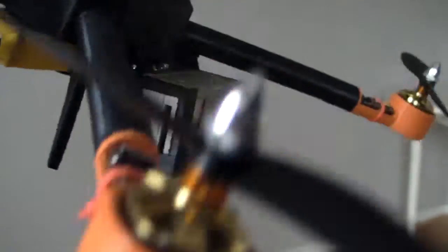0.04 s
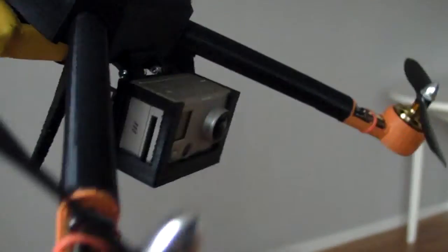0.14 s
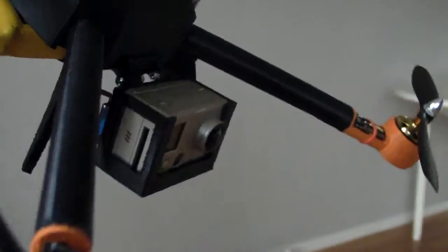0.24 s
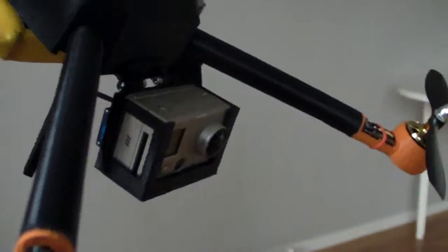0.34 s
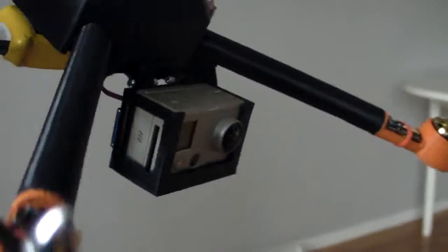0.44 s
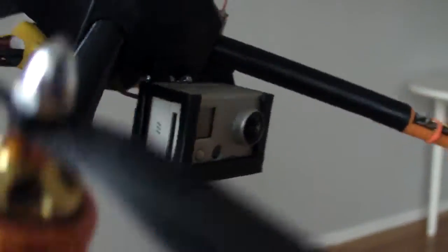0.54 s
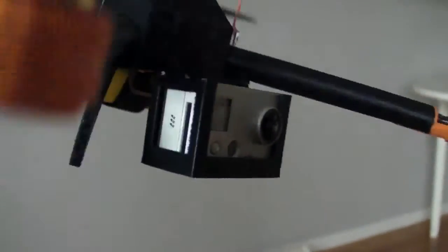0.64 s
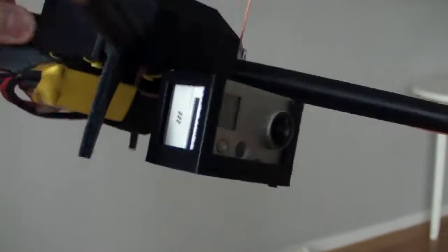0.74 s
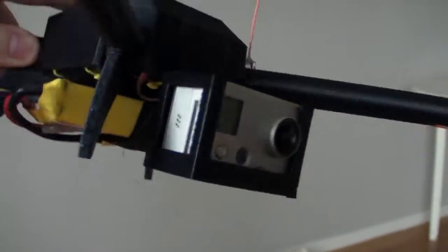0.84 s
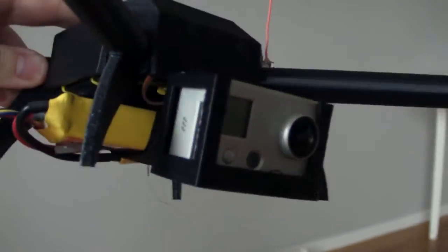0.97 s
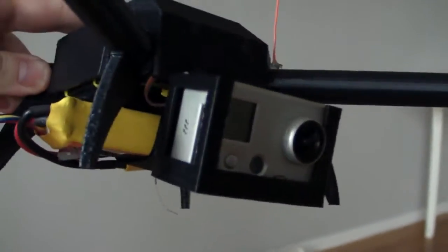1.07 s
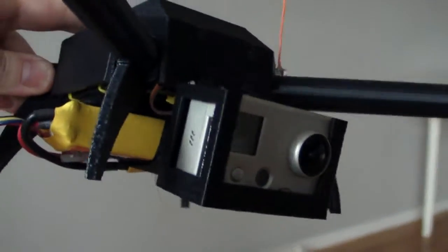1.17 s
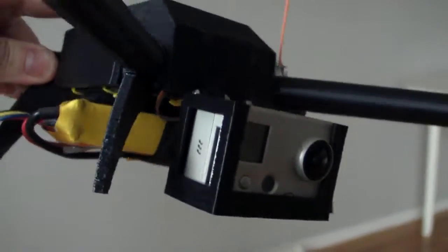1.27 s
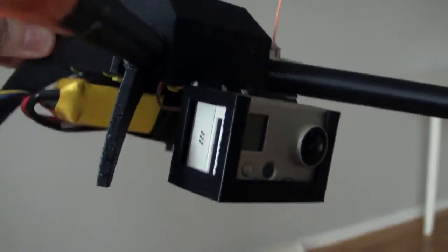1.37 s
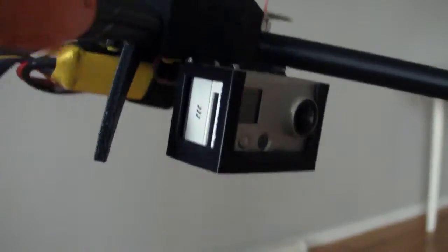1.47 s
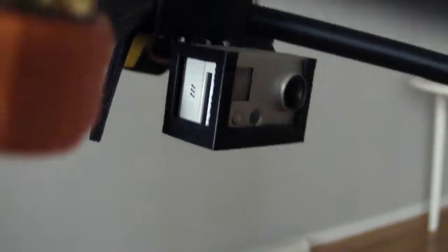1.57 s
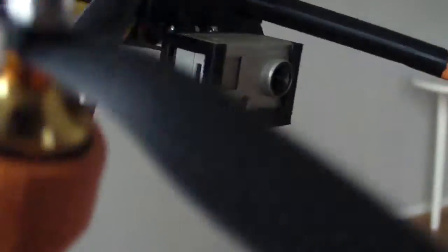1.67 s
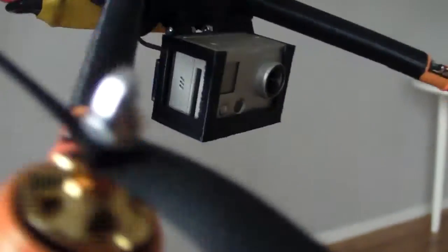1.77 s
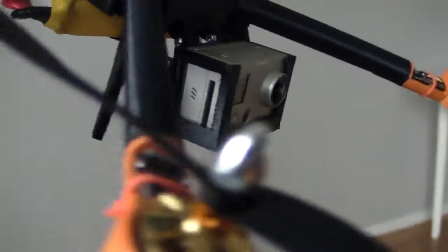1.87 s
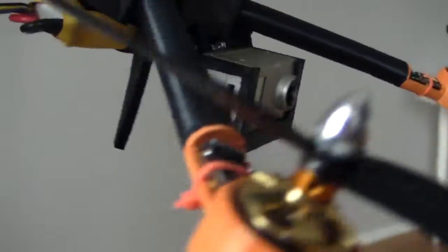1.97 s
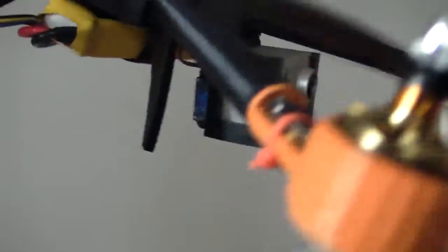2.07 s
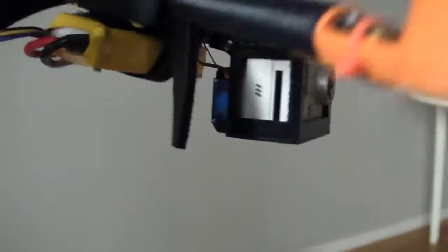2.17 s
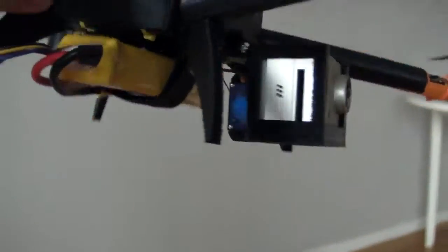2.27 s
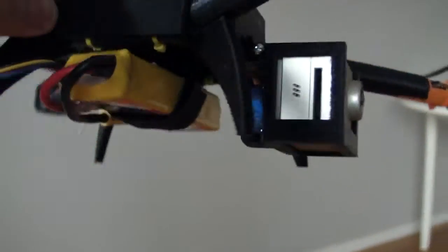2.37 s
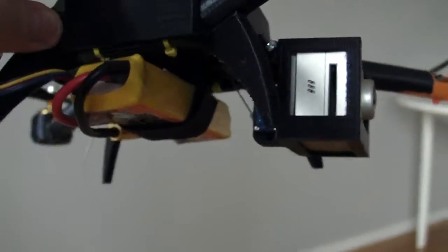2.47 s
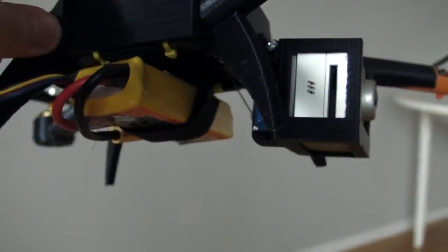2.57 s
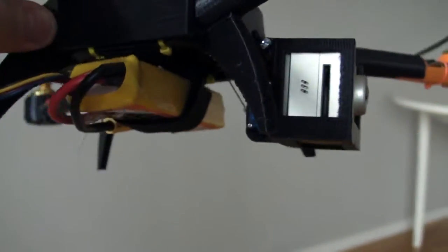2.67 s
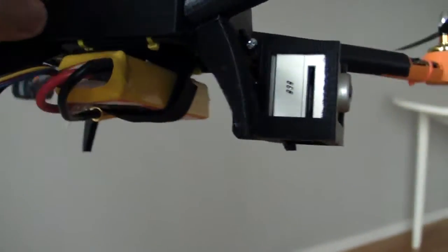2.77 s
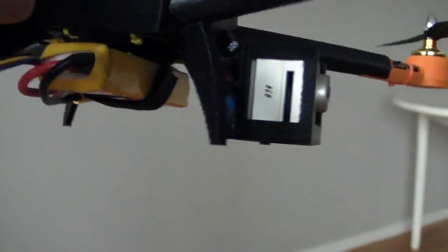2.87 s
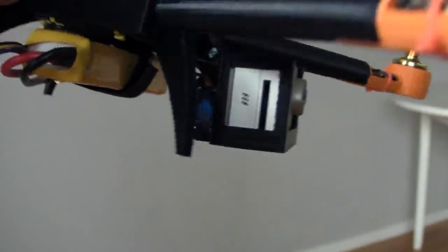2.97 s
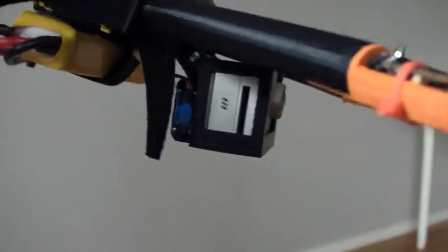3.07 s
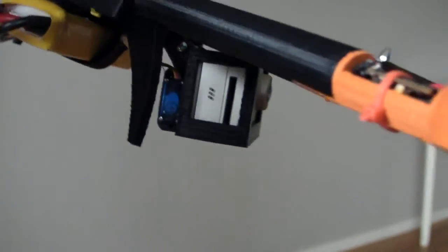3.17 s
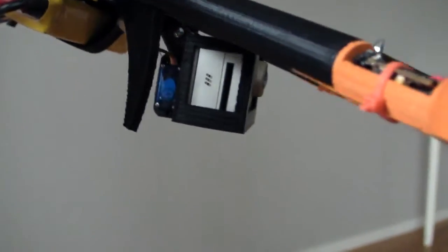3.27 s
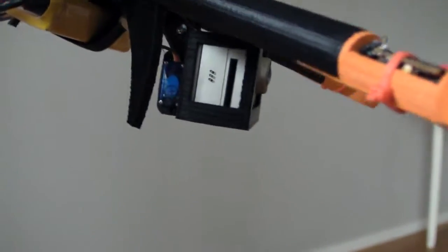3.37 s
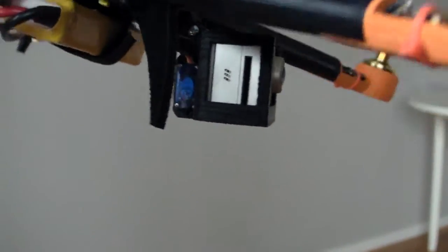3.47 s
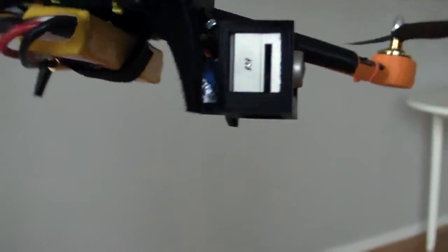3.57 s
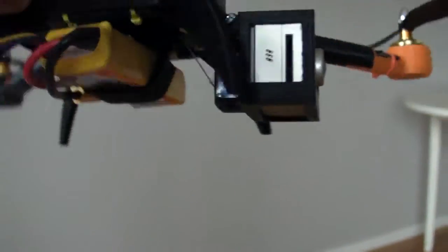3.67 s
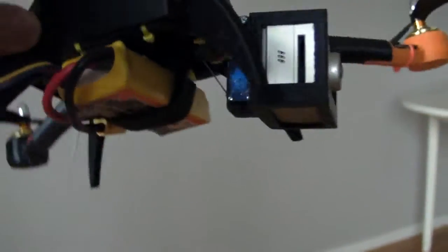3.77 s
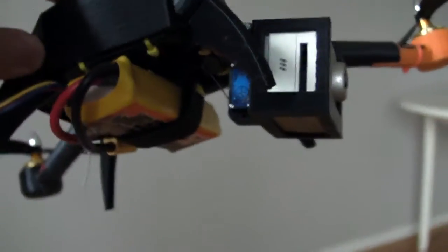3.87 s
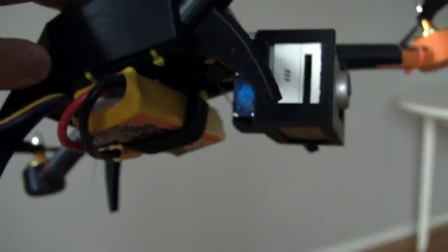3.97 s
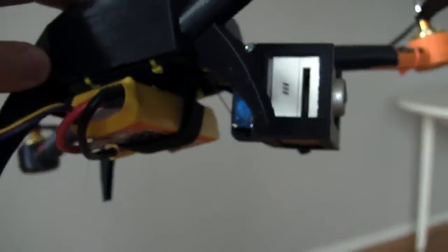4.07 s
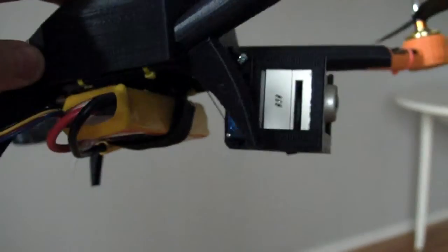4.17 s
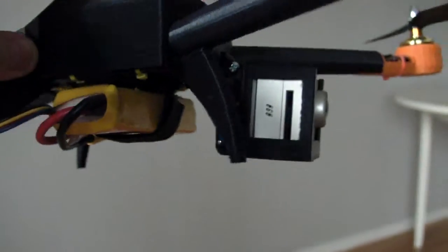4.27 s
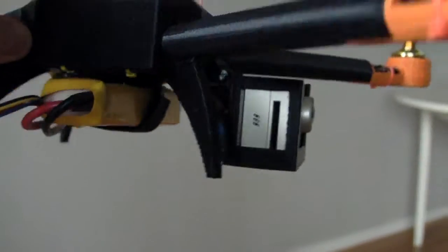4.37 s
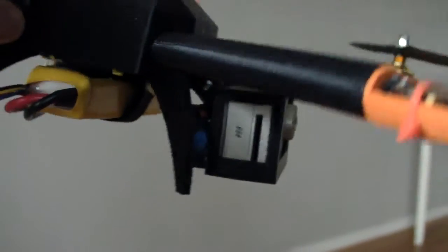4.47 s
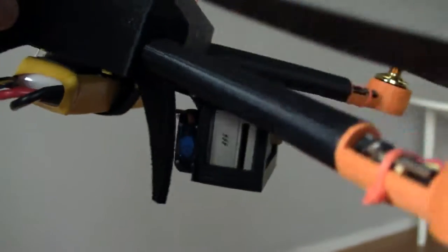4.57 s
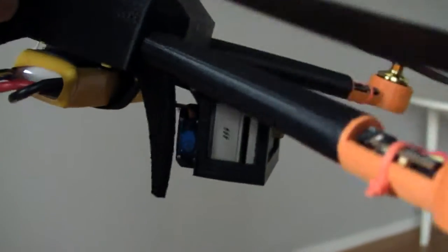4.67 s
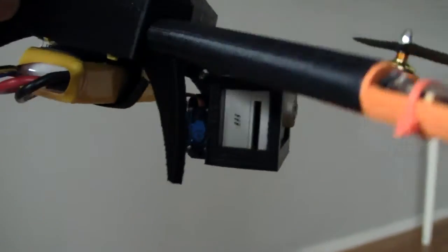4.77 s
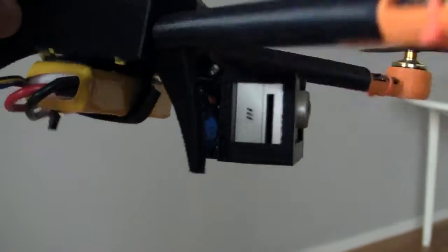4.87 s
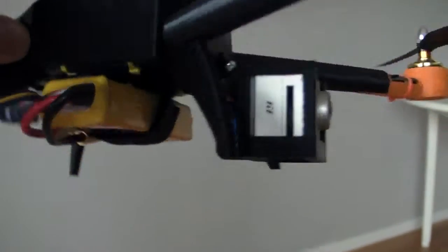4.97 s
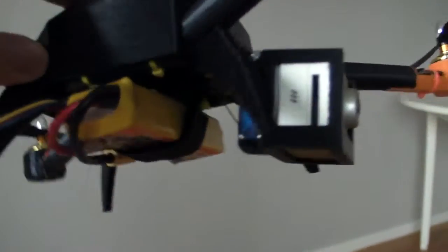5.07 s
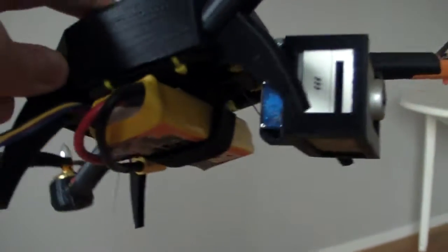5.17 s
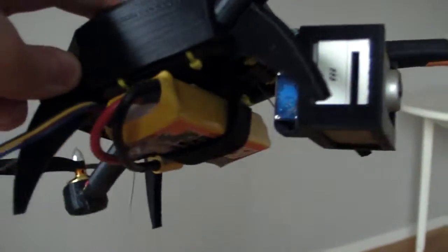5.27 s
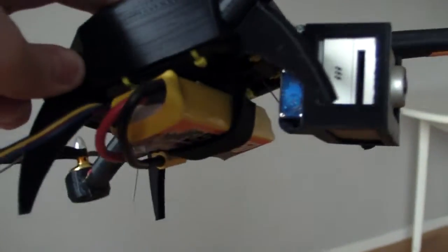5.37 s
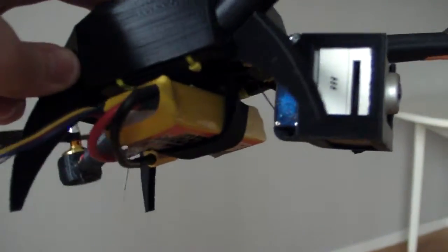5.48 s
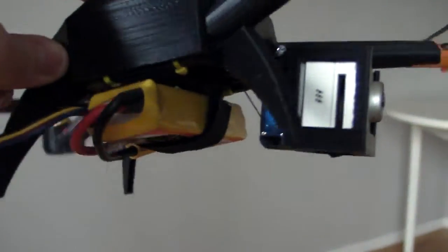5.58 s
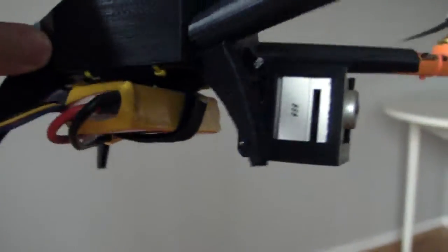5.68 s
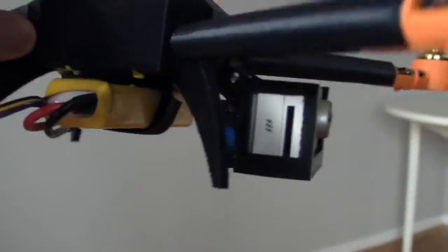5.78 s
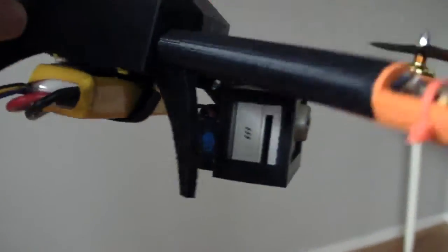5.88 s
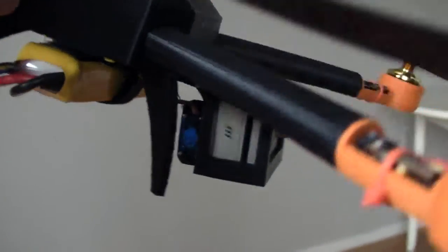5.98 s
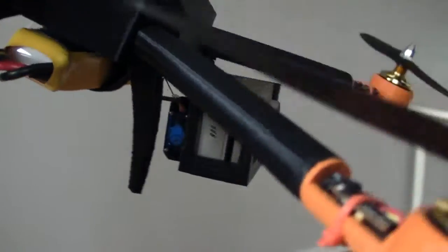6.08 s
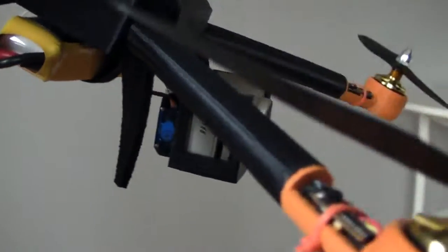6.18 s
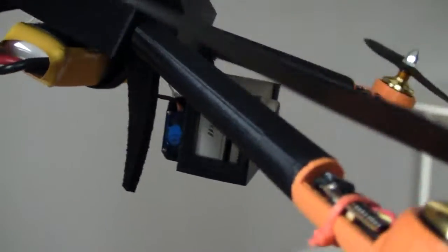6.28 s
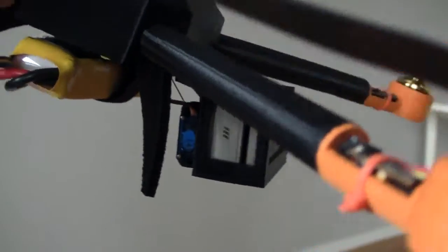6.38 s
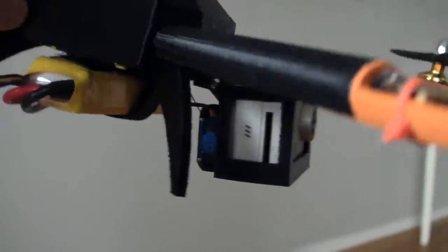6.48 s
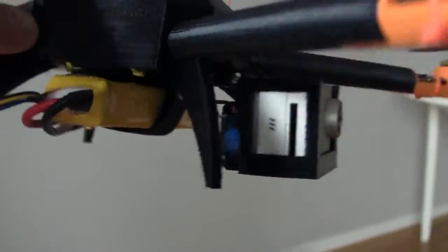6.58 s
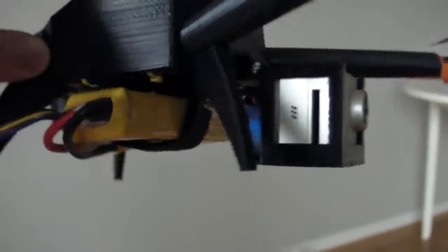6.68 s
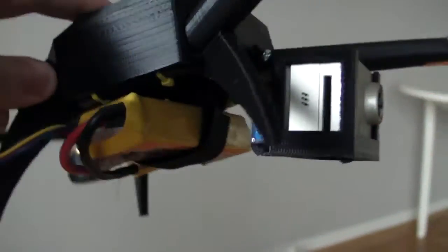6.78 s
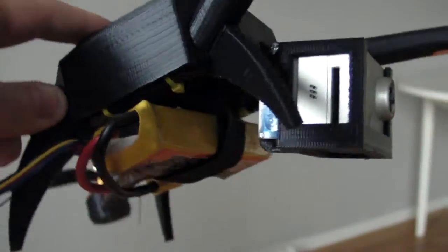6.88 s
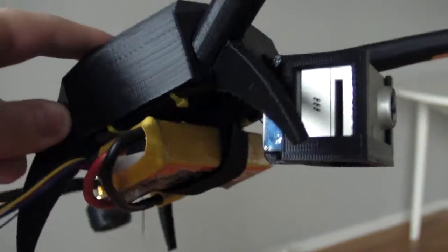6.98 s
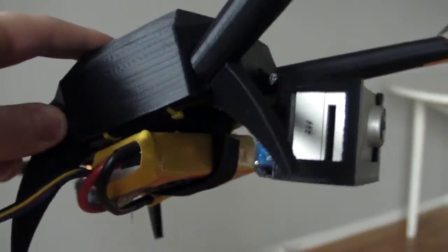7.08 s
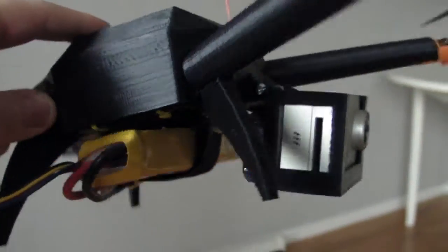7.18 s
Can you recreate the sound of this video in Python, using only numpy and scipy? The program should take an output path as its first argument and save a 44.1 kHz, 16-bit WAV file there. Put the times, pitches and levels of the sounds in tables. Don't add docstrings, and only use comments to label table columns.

```python
import sys
import numpy as np
from scipy import signal
from scipy.io import wavfile
from scipy.ndimage import uniform_filter1d

SR = 44100
rng = np.random.default_rng(int(sys.argv[2]) if len(sys.argv) > 2 else 0)


def output_pcm(signal):
    pcm = np.clip(np.atleast_2d(signal).T, -1, 1) * 32767
    wavfile.write(sys.argv[1], SR, np.round(pcm).astype(np.int16))


def field_ratio(decibels):
    return 10 ** (np.asarray(decibels, dtype=float) / 20)


N = 318843


def evened(x):
    return x / np.sqrt(np.mean(x ** 2) + 1e-20)


def read(points, hz):
    f, value = np.transpose(points)
    return np.interp(np.log(hz + 1), np.log(f + 1), value)


def slow(rate_hz):
    size = int(SR / 16 / rate_hz)
    coarse = rng.standard_normal(N // 16 + 2)
    coarse = evened(uniform_filter1d(uniform_filter1d(coarse, size), size))
    return np.interp(np.arange(N) / 16, np.arange(len(coarse)), coarse)


def add(mix, start_s, sound):
    part = mix[:, max(round(start_s * SR), 0):][:, :sound.shape[1]]
    part += sound[:, :part.shape[1]]


# pitch_hz, density_db (dB per Hz)
AIR_SPECTRUM = [(12, -50), (20, -20.5), (115, -3), (143, -5), (178, 0.5), (270, -9.5), (357, 1.5),
                (387, -4.5), (470, -10), (774, -11), (966, -14), (7510, -32.5), (15000, -62)]
# pitch_hz, left_right_likeness (-1 to 1)
COHERENCE = [(60, 0.67), (180, 0.71), (550, 0.32), (1650, 0.63), (4970, 0.35), (15000, -0.077)]


def air():
    frames, hz = N // 256 + 5, np.fft.rfftfreq(1024, 1 / SR)
    a, b, c, d, patches = rng.standard_normal((frames, 513, 5)).T
    patches = evened(uniform_filter1d(uniform_filter1d(patches, 6, 0), 20, 1))
    same = np.clip(read(COHERENCE, hz), -1, 1)[:, None]
    left = a + 1j * b
    right = same * left + np.sqrt(1 - same ** 2) * (c + 1j * d)
    z = np.array([left, right]) * field_ratio(read(AIR_SPECTRUM, hz)[:, None] + 2.42 * patches)
    return field_ratio(-45) * evened(signal.istft(z, nperseg=1024, noverlap=768)[1][:, :N])


# multiple_of_mains, level_db (rms)
MAINS_HARMONICS = [(2, -58.5), (3, -60), (4, -61), (5, -57.5), (6, -55), (7, -59.5), (8, -62.5)]
MAINS_HZ = 59.94


def buzz():
    turn = 2 * np.pi * MAINS_HZ * np.arange(N) / SR
    out = np.zeros(N)
    for k, db in MAINS_HARMONICS:
        out += np.sqrt(2) * field_ratio(db + 2.0 * slow(9.3)) * np.cos(k * turn + 0.39 * slow(14.0))
    return out


# start_s, level_db, pitch_hz, ring_s
FRAME_KNOCKS = [
    (2.771, -35, 295, 0.011),
    (2.802, -30.5, 144, 0.012),
    (3.377, -29.5, 377, 0.0098),
]


def knocks():
    out, t = np.zeros((1, N)), np.arange(3000) / SR
    for at, db, hz, ring in FRAME_KNOCKS:
        add(out, at, field_ratio(db) * (np.sin(2 * np.pi * hz * t) * np.exp(-t / ring))[None])
    return out


# pitch_hz, density_db (dB per Hz)
CASE_RESPONSE = [(590, -31), (1000, -28), (1370, -17.5), (1590, -22.5), (2270, -18), (2960, -10.5),
                 (3690, -13), (4190, -11.5), (5460, -2), (7460, -1.5), (8090, -2), (8770, -0.5),
                 (10700, -7.5), (12100, -16.5), (15800, -19.5)]
# pitch_hz, width_hz, level_db
CASE_RESONANCES = [(1934, 180, 7), (2246, 43, 10.5), (2520, 19, 6.5), (2830, 22, -13.5), (3680, 180, 3),
                   (2920, 230, -1), (4300, 370, -3.5), (4610, 27, 9), (5686, 120, 5.5), (7550, 490, 7.5),
                   (7735, 79, 5), (8130, 110, -25), (8080, 93, -12)]
PART_BORDERS = [0, 2950, 4350, 5300, 6200, 7000, 7900, 9200, 10500, 12000, 22050]


def case_parts():
    hz = abs(np.fft.fftfreq(4096, 1 / SR))
    gain_db = read(CASE_RESPONSE, hz)
    for f, width, db in CASE_RESONANCES:
        gain_db = gain_db + db / (1 + (2 * (hz - f) / width) ** 2)
    parts = []
    for lo, hi in zip(PART_BORDERS, PART_BORDERS[1:]):
        outside_hz = np.maximum(np.maximum(lo - hz, hz - hi) + 60, 0)
        log_gain = np.maximum(gain_db - outside_hz / 20, -100) * np.log(10) / 20
        causal = np.exp(np.conj(signal.hilbert(log_gain)))
        parts.append(np.fft.ifft(causal).real[:2048])
    size = np.linalg.norm(parts, axis=1, keepdims=True)
    size[:2] = np.linalg.norm(parts[:2])
    size[2:-1] = np.linalg.norm(parts[2:-1])
    return parts / size


def shares(db, mount_db, lean, focus, fizz_db, plate_db=0):
    centre_hz = np.add(PART_BORDERS[2:-2], PART_BORDERS[3:-1])[:, None] / 2
    octave = np.log2(centre_hz / 7200)
    zones_db = 40 * lean * octave - focus * octave ** 2
    flat = 0 * zones_db[0]
    return field_ratio(db + np.vstack([mount_db + plate_db + flat, mount_db + flat, zones_db, fizz_db + flat]))


# start_s, fastest_s, stop_s
TILT_TIMES = [(-0.06, 0.083, 0.125), (0.53, 0.63, 1.035), (1.155, 1.25, 1.795), (2.03, 2.14, 2.535),
              (2.66, 2.76, 2.92), (2.93, 2.99, 3.155), (3.16, 3.2, 3.215), (3.405, 3.7, 3.87),
              (3.99, 4.45, 4.58), (4.73, 4.97, 5.2), (5.375, 5.7, 6.085), (6.1, 6.15, 6.21),
              (6.29, 6.8, 6.9), (7.1, 7.2, 7.3)]
# spun_up_db, fastest_db, stop_db
TILT_EFFORTS = [(-33, -28, -35), (-32.5, -27, -35), (-36, -32, -34.5), (-44, -34, -39.5),
                (-46.5, -45, -42.5), (-30.5, -33, -36), (-37, -45, -40.5), (-40, -29.5, -34.5),
                (-41.5, -34, -34.5), (-44, -32, -34), (-45, -30.5, -38.5), (-42, -46, -39.5),
                (-43.5, -29, -40.5), (-37.5, -28, -31)]
SPIN_UP_S, SPIN_UP_DB = 0.038, -19.5
BRAKE_S, BRAKE_DB, COAST_DB_PER_S = 0.015, -7.5, 95


def grinding_db(t):
    power = 1e-12
    for (start, fastest, stop), (first_db, top_db, last_db) in zip(TILT_TIMES, TILT_EFFORTS):
        db = np.interp(t, [start, start + SPIN_UP_S, fastest, stop, stop + BRAKE_S],
                       [first_db + SPIN_UP_DB, first_db, top_db, last_db, last_db + BRAKE_DB])
        coast_s = np.maximum(t - stop - BRAKE_S, 0)
        power = power + (t >= start) * field_ratio(db - COAST_DB_PER_S * coast_s) ** 2
    return 10 * np.log10(power)


# start_s, length_s, level_db, lean_octaves
MOTOR_SURGES = [(0.040, 0.039, -22.5, 0.31), (0.094, 0.018, -22, 0.33), (0.595, 0.054, -23.5, 0.063),
                (0.688, 0.0077, -22, -0.21), (0.827, 0.039, -22, 0.009), (0.951, 0.018, -17.5, -.03),
                (1.005, 0.017, -18, -0.012), (1.221, 0.022, -21.5, 0.11), (1.278, 0.03, -22.5, .19),
                (1.327, 0.033, -20.5, 0.033), (1.380, 0.019, -23, 0.12), (1.436, 0.022, -26, 0.062),
                (1.489, 0.034, -25.5, 0.027), (1.564, .05, -23.5, 0.18), (1.636, 0.1, -24.5, 0.19),
                (1.759, 0.02, -24, 0.26), (2.112, 0.025, -26.5, .05), (2.734, 0.026, -30, -0.021),
                (2.856, 0.071, -32, -0.032), (2.946, 0.061, -30, -0.039), (3.783, 0.1, -29, -0.064),
                (4.333, 0.017, -27, -0.061), (4.954, 0.029, -23.5, 0.2), (5.143, 0.022, -24, -0.051),
                (5.645, 0.02, -23.5, 0.36), (5.742, 0.036, -23.5, 0.24), (6.63, 0.032, -29.5, 0.13),
                (6.694, 0.022, -30, -0.12), (6.788, 0.083, -25.5, .2), (7.155, 0.017, -20.5, 0.18)]
# start_s, level_db
GEAR_JOLTS = [(0.0257, -23.5), (0.562, -30), (0.579, -25), (0.885, -22.5), (0.7756, -26), (0.905, -22),
              (0.992, -21), (1.733, -24), (2.339, -27.5), (2.474, -37), (3.0745, -33), (3.483, -30),
              (3.552, -27), (3.623, -28), (3.6604, -26), (3.836, -22), (4.141, -29), (4.2118, -24),
              (4.2705, -30), (4.449, -36), (4.521, -28), (4.5746, -35), (4.897, -24.5), (5.046, -28.5),
              (5.595, -25), (5.628, -24), (5.826, -26), (5.966, -27.5), (6.589, -28), (7.1986, -19.5),
              (1.076, -28.5), (1.0992, -32), (1.1267, -37), (1.169, -31), (1.188, -34), (2.0466, -36),
              (2.083, -28.5), (2.516, -48), (2.5314, -29.5), (2.5794, -37.5), (2.821, -30.5), (3.2047, -37),
              (3.313, -38), (3.445, -43), (3.9274, -29.5), (4.017, -33), (4.643, -33.5), (4.7412, -39),
              (4.792, -30), (5.2415, -32), (5.272, -27.5), (5.3261, -41), (5.393, -40), (6.0596, -33),
              (6.3578, -40), (6.427, -33), (6.4648, -33.5), (6.8913, -26), (7.1245, -35.5), (1.215, -38)]
CONTROL_HZ, PULSE_S = 55.7, 0.0075
SURGE_RISE_S, SURGE_FALL_S, SURGE_THROB_DB = 0.0015, 0.0033, 2


def motor_pulses(tick_s, tick_db):
    chance = rng.standard_normal((len(tick_s), 2))
    kicks = zip(tick_s, tick_db - 7.5 + chance[:, 0], 0.32 * chance[:, 1])
    singles = [*kicks, *((at, db, 0) for at, db in GEAR_JOLTS)]
    return [*MOTOR_SURGES, *((at - PULSE_S / 2, PULSE_S / 2, db, lean) for at, db, lean in singles)]


def pulse_shape(u, length):
    rise, fall = np.minimum(u, 0) / SURGE_RISE_S, np.maximum(u - length, 0) / SURGE_FALL_S
    throb_db = SURGE_THROB_DB * (np.cos(2 * np.pi * CONTROL_HZ * (u - .004)) - 2.5)
    return np.exp(-rise ** 2 - fall ** 2) * field_ratio(throb_db) ** 2


# start_s, fizz_db, rasp_db, length_s
LINKAGE_SCRAPES = [
    (0.018, -48, -46, 0.035),
    (1.687, -27, -53, 0.045),
    (3.132, -35.5, -33, 0.05),
    (3.18, -61, -44.5, 0.13),
    (6.093, -41, -37.5, 0.064),
]


def scrapes(power):
    for at, fizz_db, rasp_db, length in LINKAGE_SCRAPES:
        swell = signal.windows.tukey(round(length * SR), .7)
        add(power[1:2], at, field_ratio(rasp_db - 4.5) ** 2 * swell[None])
        plate_and_fizz = power[::len(power) - 1]
        add(plate_and_fizz, at, field_ratio(np.array([[rasp_db], [fizz_db]])) ** 2 * swell)


# start_s, mount_share_db, plate_over_arm_db, lean_octaves, focus_db (per octave squared)
CASE_POSES = [(0.05, 5.8, -5.5, 0.00043, -2.5), (0.3, 3, 1.5, -0.084, 2), (0.65, 3, -1.5, 0.17, 1.5),
              (1.0, 0, -3.5, 0.032, 20), (1.4, 1, -5, -0.021, -0.5), (1.75, 2.5, -1, -0.11, 2),
              (2.3, 0.6, 1, 0.068, -5.5), (2.8, -1, 0.5, -0.033, 0), (3.1, 1.5, 0.5, -0.12, -5),
              (3.5, 1, 2.4, 0.072, -14), (3.8, -0.9, 2.8, 0.15, 9), (4.1, -3, 0.7, -0.21, 0),
              (4.5, 2.2, 0, -0.1, -4.5), (5.1, -0.5, 1.5, 0.05, -2), (5.7, -1.5, 1, -0.19, 3),
              (6.1, 3.5, 2.5, -0.054, -12.5), (6.7, 2.5, 1, 0.019, -6), (7.2, -3.5, -0.3, -0.042, 1)]
FIZZ_DB = -12.5
SLACK_S, SLACK_DB = 0.025, -2.5


def effort():
    t = np.arange(N) / SR
    s, *columns = np.transpose(CASE_POSES)
    turned_db, plate_db, lean, focus = (np.interp(t, s, c) for c in columns)
    level_db = grinding_db(t)
    for at, *_ in MOTOR_SURGES:
        level_db[round((at - SLACK_S) * SR):round(at * SR)] += SLACK_DB
    mount_db = np.minimum(-12 - 0.43 * (level_db + 33.5) + turned_db, 8)
    cycles = np.cumsum(CONTROL_HZ + 0.74 * slow(6.6)) / SR
    grind_db = level_db + 1.3 * np.cos(2 * np.pi * cycles) + 1.66 * slow(76)
    power = shares(grind_db, mount_db, lean, focus, FIZZ_DB, plate_db) ** 2
    ticks = np.flatnonzero(np.diff(np.floor(cycles)))
    for at, length, db, tilt in motor_pulses(t[ticks], level_db[ticks]):
        u = t[:round((length + .026) * SR)] - .006
        here = min(round(at * SR), N - 1)
        gain = shares(db, mount_db[here] - 3.5, lean[here] + tilt, focus[here], FIZZ_DB - 16.5, plate_db[here])
        add(power, at + u[0], gain ** 2 * pulse_shape(u, length))
    scrapes(power)
    return power * field_ratio(np.array([1.72 * slow(60) for _ in power])) ** 2


# start_s, level_db, mount_share_db, fizz_share_db, ring_s
SLACK_SNAPS = [
    (0.0519, -15, 4, 0, 0.0013),
    (1.7082, -13.5, -0.5, -7, 0.0016),
    (3.1548, -17, 0, -9, 0.0036),
    (4.97, -18, -16, -5, 0.0021),
    (6.1159, -2.5, -0.5, -9, 0.00046),
]


def snaps(blows):
    t = np.arange(900) / SR
    chatter = np.gradient(np.sign(rng.standard_normal((len(SLACK_SNAPS), 900))), axis=1)
    chatter[:, :2] = field_ratio(8.5) * np.array([1, -1])
    chatter = signal.lfilter(*signal.butter(2, 1600, "high", fs=SR), chatter)
    for (at, db, mount_db, fizz_db, ring), noise in zip(SLACK_SNAPS, chatter):
        add(blows, at, shares(db, mount_db, 0, 0, fizz_db, 6) * noise * np.exp(-t / ring))


TEETH_PER_S = 7000


def servo():
    size = field_ratio(1.3 * np.minimum(rng.exponential(1, N), 5)) * rng.standard_normal(N)
    teeth = evened(size * (rng.random(N) < TEETH_PER_S / SR))
    rubbing = 0.66 * rng.standard_normal(N)
    blows = evened(teeth + rubbing) * np.sqrt(effort())
    snaps(blows)
    return signal.oaconvolve(blows, case_parts(), axes=1)[:, :N].sum(0)


def shimmer(x):
    z = signal.stft(x, nperseg=1024)[2]
    streaks = rng.standard_normal(z.shape)
    for axis in (0, 1):
        streaks = uniform_filter1d(streaks, size=3, axis=axis)
    return signal.istft(z * evened(field_ratio(3.17 * evened(streaks))), nperseg=1024)[1][:N]


# pitch_hz, t60_s
ROOM_DECAY = [(1000, 0.57), (4000, 0.57), (8000, 0.13), (14000, 0.56)]


def room_tail():
    taps = np.zeros((2, SR))
    at = np.arange(300, SR - 20, 20) + rng.integers(0, 20, (2, (SR - 301) // 20))
    np.put_along_axis(taps, at, rng.choice([-1., 1.], at.shape), 1)
    hz, t, z = signal.stft(taps, SR, nperseg=256)
    tail = signal.istft(z * field_ratio(-60 * t / read(ROOM_DECAY, hz)[:, None]), SR, nperseg=256)[1]
    return field_ratio(-7.5) * tail / np.linalg.norm(tail[0])


def placed(x):
    out = signal.fftconvolve(x[None], room_tail(), axes=1)[:, :N]
    pose, n = np.arange(N) / SR * 5.5, np.arange(300)
    lags = 0.85 * np.linspace(0.096, 1.23, 6)
    for k in range(6):
        near = rng.standard_normal((2, 300)) * np.exp(-n / 42.0)
        near *= (rng.random((2, 300)) < .15) * (n > 20)
        near /= np.linalg.norm(near, axis=1, keepdims=True)
        near = signal.lfilter(*signal.butter(2, 5000, "high", fs=SR), near)
        lag = lags[k * 5 % 6] * np.array([[.5], [-.5]])
        direct = np.sinc(n - 16 - lag) * np.clip(1 - ((n - 16) / 16) ** 2, 0, 1)
        weight = np.cos(np.pi / 2 * np.clip((pose - k) % 6 - 1, -1, 1)) ** 2
        out += signal.oaconvolve((x * weight)[None], direct + field_ratio(-1) * near, axes=1)[:, 16:N + 16]
    return out


def scene():
    return air() + buzz() + knocks() + placed(shimmer(servo()))


# pitch_hz, level_db
MASKING = [(1200, -14), (2600, -5), (4500, -5), (5200, -14), (10800, -12), (12000, 1), (15500, 2)]
TOP_HZ = 15800


def thinned(x):
    hz, _, z = signal.stft(np.pad(x, ((0, 0), (135, 0))), SR, "cosine", 2048, 1024)
    power = (abs(z) ** 2).mean(0)
    around = np.log(uniform_filter1d(power, size=61, axis=0) + 1e-20)
    around = np.exp(uniform_filter1d(around, size=3, axis=1))
    banded = np.add.reduceat(power, np.arange(0, 1025, 14), axis=0) / 14
    banded = np.repeat(banded, 14, axis=0)[:1025]
    weighed = np.where(hz[:, None] > 11300, banded, uniform_filter1d(power, size=7, axis=0))
    kept = weighed > around * field_ratio(read(MASKING, hz)[:, None]) ** 2
    z = z * kept * (hz < TOP_HZ)[:, None]
    return signal.istft(z, SR, "cosine", 2048, 1024)[1][:, 135:N + 135]


def top_cut(x):
    return signal.sosfilt(signal.butter(12, 16450, fs=SR, output="sos"), x)


def record(dry):
    mix = thinned(dry)
    return top_cut(mix)


dry = scene()
out = record(dry)
output_pcm(out)
```